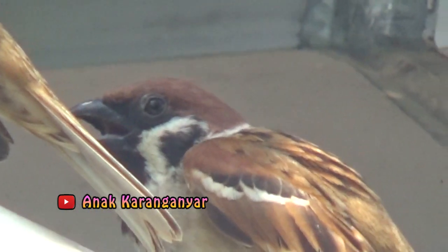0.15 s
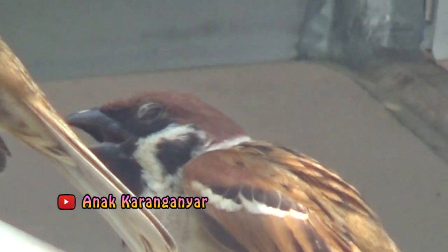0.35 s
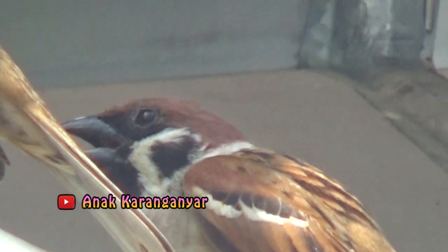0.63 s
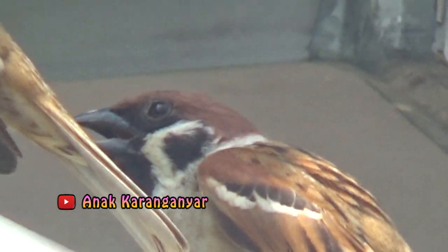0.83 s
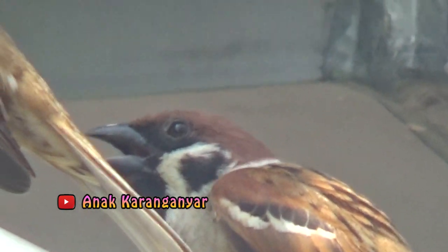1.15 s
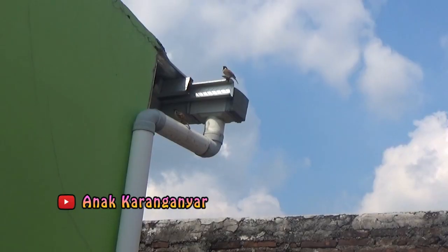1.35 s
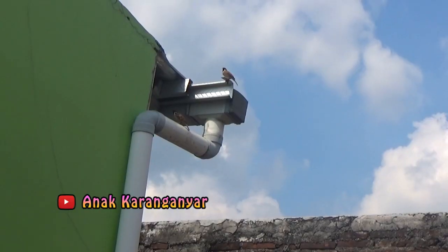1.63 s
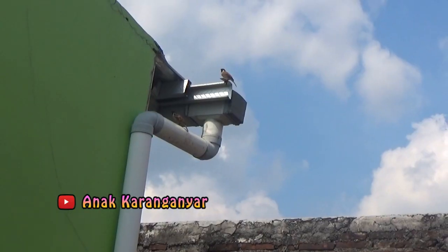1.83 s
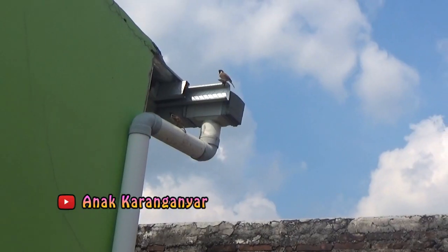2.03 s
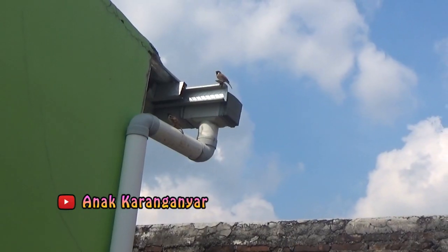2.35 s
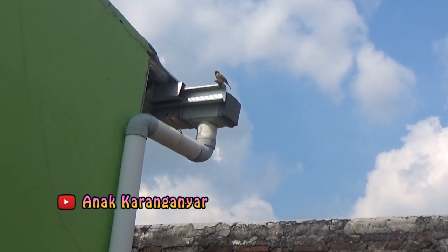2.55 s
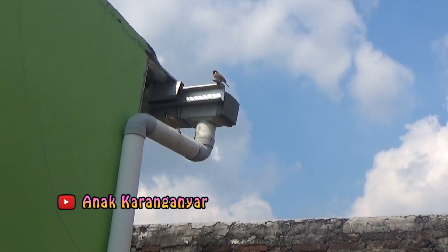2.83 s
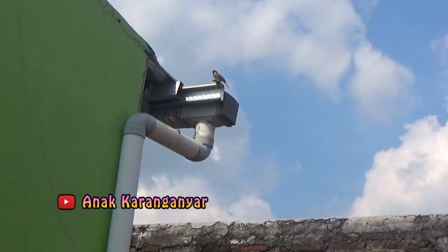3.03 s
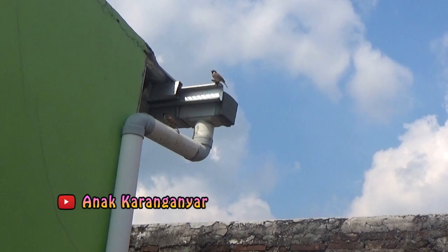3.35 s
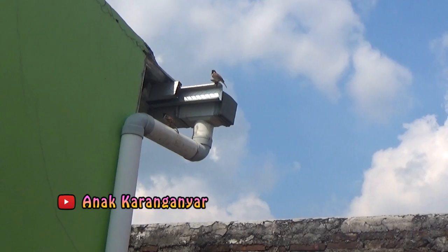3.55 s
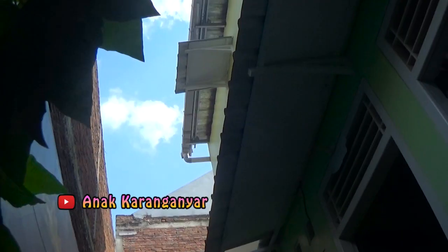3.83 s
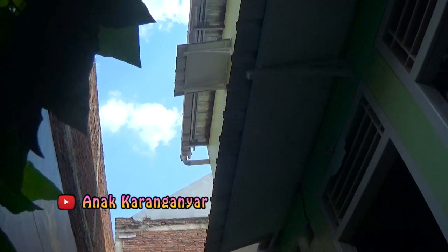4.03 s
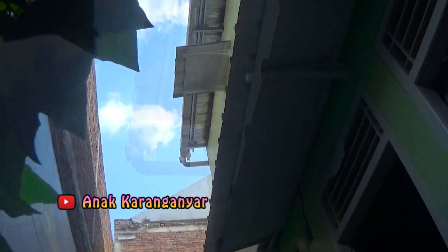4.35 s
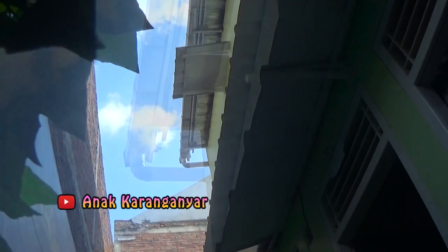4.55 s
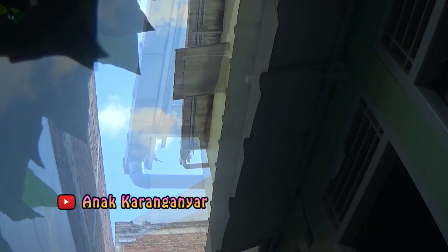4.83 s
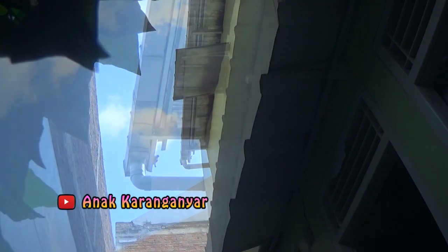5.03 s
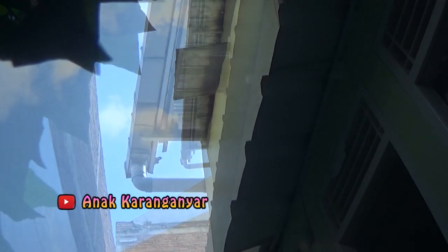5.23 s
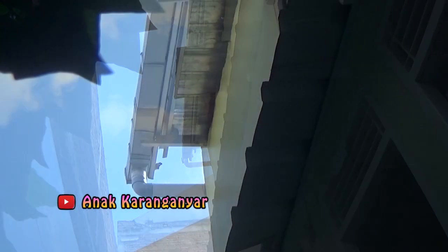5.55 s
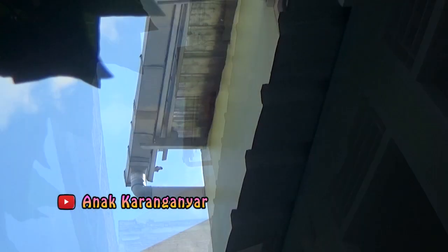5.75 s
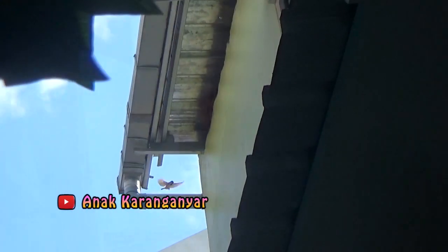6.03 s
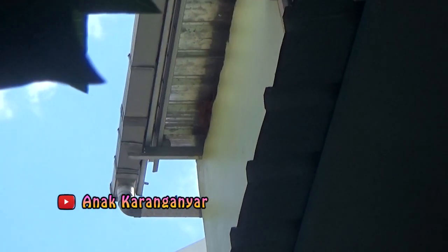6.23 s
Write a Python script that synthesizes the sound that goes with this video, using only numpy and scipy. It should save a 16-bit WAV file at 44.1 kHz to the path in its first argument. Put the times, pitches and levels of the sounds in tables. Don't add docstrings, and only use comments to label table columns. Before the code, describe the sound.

Small birds chatter and chirp sharply in an echoing narrow alley, with light taps on sheet metal, breezy hiss and a distant low hum.

```python
import sys
import numpy as np
from scipy import signal
from scipy.fft import rfft, irfft, next_fast_len
from scipy.io import wavfile

SR = 44100
rng = np.random.default_rng(int(sys.argv[2]) if len(sys.argv) > 2 else 0)


def voltage_ratio(level):
    return 10 ** (np.asarray(level, float) / 20)


def int16_out(signal):
    q = np.round(np.clip(np.atleast_2d(signal).T, -1, 1) * 32767)
    wavfile.write(sys.argv[1], SR, q.astype(np.int16))


N = 281799


def rms_one(x):
    return x / np.sqrt(np.mean(x ** 2) + 1e-20)


def in_time(rows):
    s, *columns = np.transpose(rows)
    return [np.interp(np.arange(N) / SR, s, column) for column in columns]


def at_hz(points, hz):
    table_hz, values = np.transpose(points)
    return np.interp(np.log(hz), np.log(table_hz), values)


def wander(count, rate_hz):
    pole = np.exp(-2 * np.pi * rate_hz / SR)
    white = rng.standard_normal(count + 4000)
    smooth = rms_one(signal.lfilter([1], [1, -2 * pole, pole * pole], white))
    return smooth[-count:]


def resonance(x, hz, width_hz):
    r = np.exp(-np.pi * min(width_hz, 9000) / SR)
    poles = [1, -2 * r * np.cos(2 * np.pi * hz / SR), r * r]
    return signal.lfilter([(1 - r * r) / 2, 0, (r * r - 1) / 2], poles, x)


def add(track, s, note):
    at = max(round(s * SR), 0)
    track[at:at + len(note)] += note[:N - at]


# (frequency [Hz], density [dB per Hz])
AIR_SPECTRUM = [(25, -35), (64, -23), (200, -12), (400, -6), (1200, -9), (5000, -12), (10000, -21),
                (16500, -24.5)]
# (frequency [Hz], likeness [0-1])
AIR_LIKENESS = [(60, 0.75), (180, 1), (550, 0.47), (1650, 0.16), (4970, 0.8), (15000, 0.52)]


def air(hiss_db, patchy_db):
    out = 0
    edges = 22 * 2 ** np.arange(0, 9.6, .5)
    white = rng.standard_normal((2, 2, N))
    for k, (low, high) in enumerate(zip(edges, edges[1:])):
        band = signal.butter(2, [low, high], "band", fs=SR, output="sos")
        mid, side = signal.sosfilt(band, white[k % 2])
        hz = np.sqrt(low * high)
        alike = np.clip(at_hz(AIR_LIKENESS, hz), 0, 1)
        flicker_db = patchy_db * (hz < 7000) * wander(N, 2.87)
        leaves_db = hiss_db * (1500 < hz < 8000)
        gain = voltage_ratio(at_hz(AIR_SPECTRUM, hz) + flicker_db + leaves_db)
        out = out + gain * (np.sqrt(1 + alike) * mid + np.sqrt(1 - alike) * side * [[1], [-1]])
    return rms_one(out)


MOTOR_FADE_DB_PER_S = 62
# (start [s], end [s], level [dB])
HIGH_MOTOR = [
    (0, .6, -88),
    (1.45, 3.65, -63.5),
    (4.5, 4.9, -67.5),
    (5.95, 6.3, -67),
]
LOW_MOTOR = [
    (1.8, 3.4, -80),
    (3.85, 4.95, -69.5),
    (5.5, 6.5, -75),
]


def motor(passes, hz, width_hz):
    t = np.arange(N) / SR
    level = 0
    for start, end, db in passes:
        outside_s = np.maximum(np.maximum(start - t, t - end), 0)
        level = level + voltage_ratio(db - MOTOR_FADE_DB_PER_S * outside_s)
    hum = resonance(resonance(rng.standard_normal(N), hz, width_hz), hz, width_hz)
    return level * rms_one(hum)


BURR_HZ = 359.7


def syrinx(pitch_hz, partials_db, burr, jitter, rise):
    count = len(pitch_hz)
    share = np.arange(count) / count
    beat = 2 * np.pi * np.cumsum(BURR_HZ * (1 + .1 * wander(count, 30)) / SR)
    shaken_hz = pitch_hz * (1 + burr * (np.sin(beat) + jitter * wander(count, 445)))
    phase = 2 * np.pi * np.cumsum(shaken_hz) / SR
    pulsing = 1 + np.clip(6 * burr, 0, .5) * np.cos(beat)
    swell = np.sin(np.pi / 2 * np.interp(share, [0, rise, 1], [0, 1, 0])) ** 1.3
    partials = np.array([voltage_ratio(db) * np.sin((k + 1) * phase) for k, db in enumerate(partials_db)])
    return partials * pulsing * swell


def breath(under, hz, width_hz):
    noise = resonance(rng.standard_normal(len(under)), hz, width_hz)
    return rms_one(noise) * np.abs(under)


BEAK_CUT_HZ = 7510
SCOLD_S = .042
SCOLD_BEND = [(0, .92), (.25, .99), (.55, 1.01), (1, .96)]


def scold_note(third_hz, first_db, second_db, top_db, length=SCOLD_S, shape=SCOLD_BEND):
    share = np.linspace(0, 1, int(length * SR))
    bend = np.interp(share, *np.transpose(shape))
    partials_db = [first_db + 0.0, second_db - 3, 0, top_db + 9.5, top_db - 2, top_db + 1, top_db - 22]
    rows = syrinx(third_hz / 3 * bend, partials_db, burr=.06, jitter=.95, rise=.3)
    rasp = rows[:3].sum(axis=0) + voltage_ratio(-4.5) * breath(rows[2], 4750, 2000)
    throat = signal.sosfilt(signal.butter(6, BEAK_CUT_HZ, fs=SR, output="sos"), rasp)
    spray = voltage_ratio(top_db + 10.5) * breath(rows[2], 9800, 4000)
    return throat + rows[3:].sum(axis=0) + spray


MEAN_EFFORT_DB = -30
LOW_LAG = (0.67, 0.58)
# (first dB, second dB, top dB)
NEAR_VOICE_DB, THIN_VOICE_DB = (-9, -2, -29), (-19.5, -17, -29.5)
THIN_S, THIN_BEND = .03, [(0, .86), (.3, 1.02), (.55, .99), (1, .95)]
# (time [s], third partial peak [dB], third partial [Hz])
SCOLD = [(0.0044, -38.5, 6600), (0.0498, -31.5, 6340), (0.1286, -30.5, 6690), (0.2409, -31.5, 6350),
         (0.3174, -34, 6090), (1.1423, -49, 6220), (1.6312, -35, 6080), (1.7045, -34, 6500),
         (1.7883, -31, 6390), (1.8572, -30, 6290), (1.9659, -27, 6240), (2.0298, -26, 6310),
         (2.1036, -25, 6294), (2.1889, -25, 6060), (2.2777, -24.5, 6220), (2.3784, -29, 6200),
         (2.4573, -26.5, 6280), (2.5576, -26.5, 6114), (2.8315, -28.5, 6330), (2.9123, -25.5, 6280),
         (3.0555, -30.5, 6076), (3.1946, -26, 6335), (3.2814, -25, 6650), (3.3593, -24.5, 6070),
         (3.4526, -24, 5955), (3.5523, -26, 6120), (4.7514, -39, 6330), (4.815, -35, 6080),
         (4.8748, -35, 6410), (4.9721, -35, 6340)]
# (time [s], third partial peak [dB], third partial [Hz])
THIN_SCOLD = [
    (5.9035, -33.5, 6100),
    (5.9773, -33.5, 6010),
    (6.0741, -30.5, 6004),
    (6.1529, -28, 6050),
    (6.3034, -33.5, 6130),
]


def scolding():
    out = np.zeros(N)
    near = SCOLD, NEAR_VOICE_DB, SCOLD_S, SCOLD_BEND
    thin = THIN_SCOLD, THIN_VOICE_DB, THIN_S, THIN_BEND
    for notes, (first_db, second_db, top_db), length, shape in (near, thin):
        for s, db, hz in notes:
            effort_db = db - MEAN_EFFORT_DB
            first, second = np.array([first_db, second_db]) - effort_db * np.array(LOW_LAG)
            add(out, s - .009, voltage_ratio(db - 2.0) * scold_note(hz, first, second, top_db, length, shape))
    return out


# (time [s], peak [dB], ring [Hz]); taps are soft and almost tonal
TAPS = [
    (0.049, -49, 1250),
    (.51, -50, 761),
    (0.554, -42, 1235),
    (1.094, -47.5, 1150),
    (1.30, -51, 930),
    (3.784, -49, 1060),
]
FEET = [
    (.56, -42, 1620),
    (2.713, -46, 1280),
    (4.069, -45, 475),
    (4.079, -46, 1590),
    (4.949, -43.5, 1280),
    (5.84, -48, 597),
]
LANDINGS = [
    (3.35, -45, 547),
    (3.441, -37.5, 455),
    (3.468, -52, 670),
]
WINGS = [
    (1.476, -53.5, 5130),
    (4.24, -49, 885),
    (4.448, -52, 6850),
    (4.952, -43, 5600),
    (4.952, -33.5, 2880),
    (5.609, -56, 1890),
    (5.795, -53, 3460),
    (6.002, -60, 9500),
]
# (ring width as share of its pitch [ratio], t60 [s])
KNOCK_KINDS = [
    (.18, 0.16),
    (.5, 0.13),
    (.7, 0.32),
    (1.2, .14),
]


def knocks():
    out = np.zeros(N)
    t = np.arange(int(.35 * SR)) / SR
    for contacts, (width_share, t60) in zip((TAPS, FEET, LANDINGS, WINGS), KNOCK_KINDS):
        for s, db, hz in contacts:
            width_hz = width_share * hz
            rustle = rng.standard_normal(len(t))
            ring = rms_one(resonance(resonance(rustle, hz, width_hz), hz, width_hz))
            onset = np.minimum(t / 0.00039, 1)
            add(out, s, voltage_ratio(db - 60 * t / t60) * onset * ring)
    return out


# (time [s], length [s], start [Hz], peak [dB])
FALLS = [(0.296, 0.07, 4790, -36), (0.353, 0.031, 3816, -33.5), (1.185, 0.047, 5310, -31.5),
         (1.47, 0.03, 3800, -54.5), (2.321, 0.033, 4950, -27), (2.344, 0.031, 4090, -27.5),
         (2.657, 0.086, 3270, -47), (3.089, 0.028, 4930, -37), (3.099, 0.025, 3685, -35),
         (3.68, 0.056, 5110, -39), (3.942, 0.049, 5570, -36), (3.946, 0.05, 4140, -33.5),
         (3.955, 0.042, 2920, -39), (4.044, 0.038, 5370, -39.5), (4.088, 0.045, 4150, -44.5),
         (4.49, 0.057, 5340, -40.5), (4.735, 0.028, 5720, -36), (4.757, 0.039, 4090, -38.5),
         (4.867, 0.036, 5510, -34.5), (4.966, 0.032, 5680, -35), (5.498, 0.015, 6080, -51.5),
         (5.809, 0.046, 6270, -49.5), (6.123, 0.029, 5200, -37.5), (6.253, 0.018, 5240, -32.5),
         (6.356, 0.038, 5260, -33)]
BUZZES = [(0.903, 0.025, 4010, -44), (0.918, 0.024, 6110, -40.5), (1.136, 0.02, 5740, -36),
          (3.383, 0.042, 4624, -24.5), (3.388, 0.03, 3690, -27), (3.66, 0.031, 2970, -47),
          (4.53, 0.047, 2810, -54), (4.536, 0.048, 3750, -44), (4.58, 0.022, 3665, -50),
          (5.354, 0.032, 6380, -46), (5.359, 0.036, 4730, -40), (5.376, 0.037, 3640, -46)]
RISES = [(1.198, 0.028, 2850, -31), (3.035, 0.018, 5570, -27.5), (4.709, 0.067, 5250, -48.5),
         (5.797, 0.018, 2450, -53), (5.825, 0.038, 2940, -52.5), (5.86, 0.035, 3390, -51),
         (6.138, .05, 2300, -50.5), (6.147, 0.036, 3170, -42), (6.257, 0.022, 1530, -47.5),
         (6.265, 0.027, 3245, -41), (6.353, 0.038, 1563, -53), (6.359, 0.027, 1100, -54),
         (6.37, 0.035, 3230, -49)]
WHISTLES = [(0.744, 0.037, 6970, -46), (1.93, 0.026, 4250, -41), (1.943, 0.031, 3532, -30.5),
            (1.976, 0.039, 3310, -39), (2.015, 0.034, 3170, -40), (2.316, 0.042, 5710, -33),
            (2.669, 0.039, 6900, -45.5), (4.446, 0.03, 5430, -54), (4.61, 0.024, 3440, -49),
            (4.682, 0.019, 5250, -46.5), (6.283, 0.019, 3530, -41)]
CHIRP_KINDS = [
    (.81, 0.96),
    (0.89, 0.71),
    (1.13, 0.52),
    (.945, 0.2),
]


def chirps():
    out = np.zeros(N)
    for notes, (end_share, burr) in zip((FALLS, BUZZES, RISES, WHISTLES), CHIRP_KINDS):
        burr = np.clip(burr, 0, 1)
        for s, length, start_hz, db in notes:
            glide_hz = np.geomspace(start_hz, end_share * start_hz, int(1.6 * length * SR))
            rows = syrinx(glide_hz, [0, -21, -37], burr=.12 * burr, jitter=.4 * burr, rise=.3)
            air_noise = burr * voltage_ratio(-14.5) * breath(rows[0], 5400, 4500)
            add(out, s, voltage_ratio(db) * (rows.sum(axis=0) + air_noise))
    return out


# (time [s], level [dB])
FLOCK = [
    (0.3, -47.5),
    (0.506, -52),
    (1.1, -52.5),
    (1.18, -46.5),
    (1.306, -53),
    (1.35, -93),
]


def flock():
    out = np.zeros(N)
    first, last = FLOCK[0][0], FLOCK[-1][0]
    for k, (late, tune, db) in enumerate(rng.standard_normal((80, 3))):
        s = first + (last - first) * (k + 0.53 * late) / 80
        add(out, s, voltage_ratio(0.66 * db) * scold_note(6100 * (1 + .11 * tune), -4.5, 0.53, -40.0))
    heard_rms = np.sqrt(np.mean(out[round(first * SR):round(last * SR)] ** 2))
    return voltage_ratio(in_time(FLOCK)[0] + 4.5) * out / heard_rms


def voices():
    birds = scolding() + chirps() + flock()
    high = signal.sosfilt(signal.butter(4, 1000, "high", fs=SR, output="sos"), birds)
    return signal.sosfilt(signal.butter(2, 11500, fs=SR, output="sos"), high + knocks())


EARLY_T60_S, EARLY_DB = 0.053, -21.5
ALLEY_T60_S, ALLEY_DB, DIRECT_DB = .34, 1, -.5
WALL_LOW_HZ, WALL_LOW_WIDTH_HZ, WALL_LOW_LOSS = 1460, 1400, .55


def alley(x):
    t = np.arange(int(.6 * SR)) / SR
    mid, side = rng.standard_normal((2, len(t)))
    scatter = mid + 0.3 * side * np.array([[1], [-1]])
    decay = voltage_ratio(-60 * t / ALLEY_T60_S) + voltage_ratio(EARLY_DB - 60 * t / EARLY_T60_S)
    scatter = scatter * decay * np.minimum(t / 0.0007, 1)
    scatter = voltage_ratio(ALLEY_DB) * scatter / np.sqrt(np.sum(scatter ** 2) / 2)
    scatter = scatter - WALL_LOW_LOSS * resonance(scatter, WALL_LOW_HZ, WALL_LOW_WIDTH_HZ)
    return voltage_ratio(DIRECT_DB) * x + signal.fftconvolve(x[None], scatter, axes=1)[:, :N]


LEFT_LAG_S = 1.5e-5
# (time [s], air level [dB], leafy hiss over it [dB])
TOWN = [
    (0, -47, 8),
    (.3, -50.5, 4),
    (.9, -49, 5),
    (1.3, -49.5, -5.5),
    (2, -48, -0.5),
    (3.6, -48.5, 3.5),
    (4, -49, -2.5),
    (5.9, -52, -1),
    (6.39, -52.5, 8),
]


def scene():
    air_db, hiss_db = in_time(TOWN)
    birds = alley(voices()) * voltage_ratio(np.array([[.4], [-.4]]))
    size = next_fast_len(N)
    lag = np.exp(-2j * np.pi * np.fft.rfftfreq(size, 1 / SR) * LEFT_LAG_S)
    birds[0] = irfft(rfft(birds[0], size) * lag, size)[:N]
    town = voltage_ratio(air_db) * air(hiss_db, patchy_db=2.56)
    return birds + town + motor(LOW_MOTOR, 169, 59) + motor(HIGH_MOTOR, 351, 64)


def low_pass(x):
    return signal.sosfilt(signal.butter(12, 15750, fs=SR, output="sos"), x)


SIDE_CUT_HZ, TOP_CUT_HZ = 9460, 15950


def record(dry):
    side_filter = signal.butter(4, SIDE_CUT_HZ, fs=SR, output="sos")
    side = signal.sosfiltfilt(side_filter, dry[0] - dry[1]) / 2
    pair = dry.mean(axis=0) + side * np.array([[1], [-1]])
    mix = signal.sosfilt(signal.cheby2(16, 60, TOP_CUT_HZ, fs=SR, output="sos"), pair)
    return low_pass(mix)


dry = scene()
out = record(dry)
int16_out(out)
```